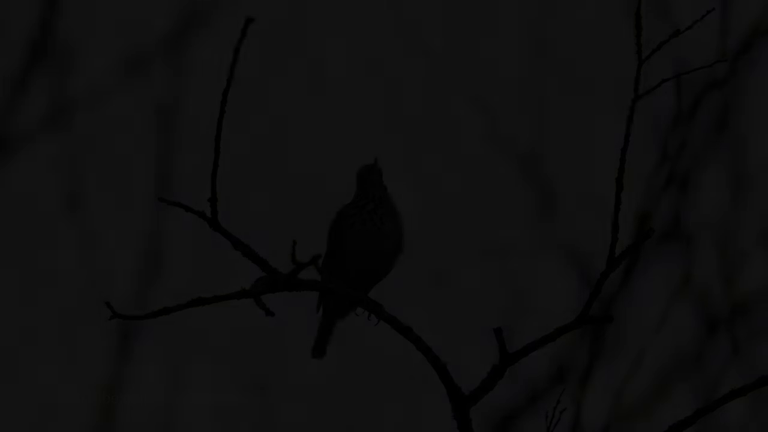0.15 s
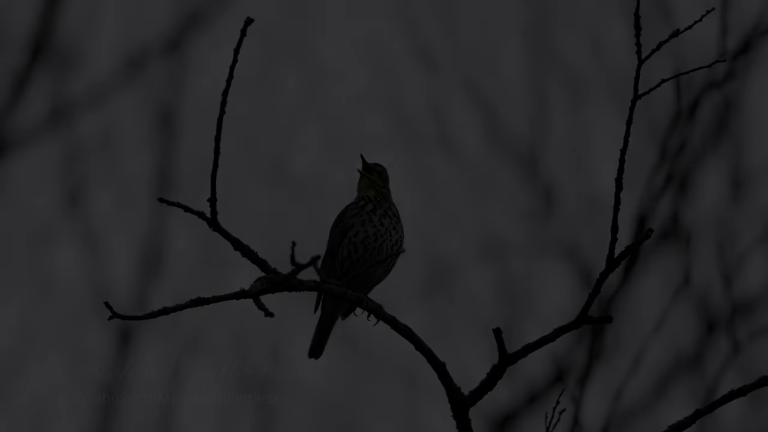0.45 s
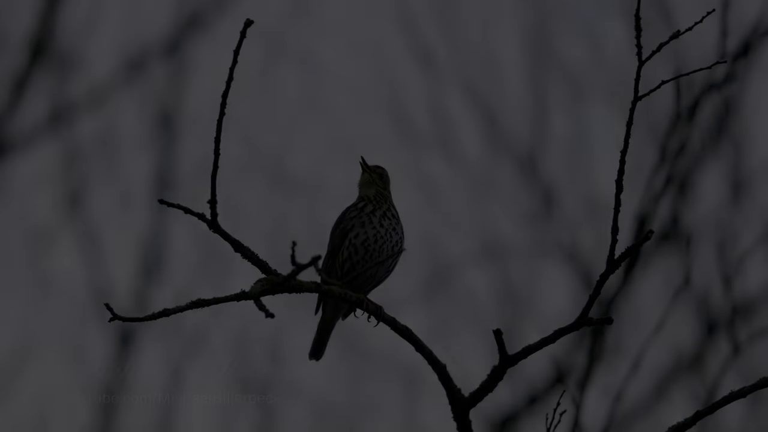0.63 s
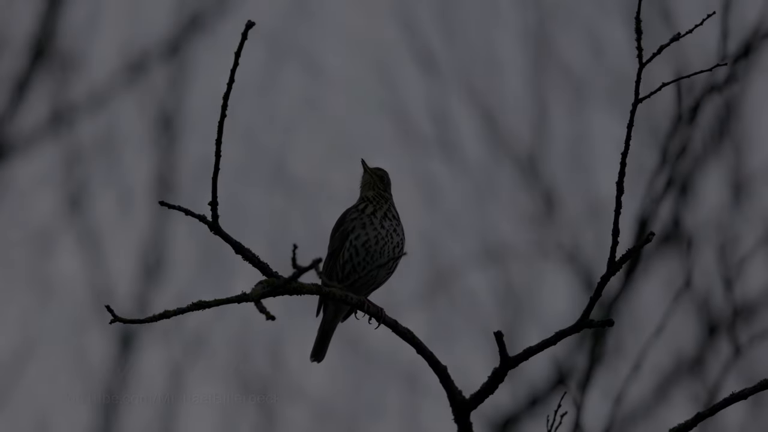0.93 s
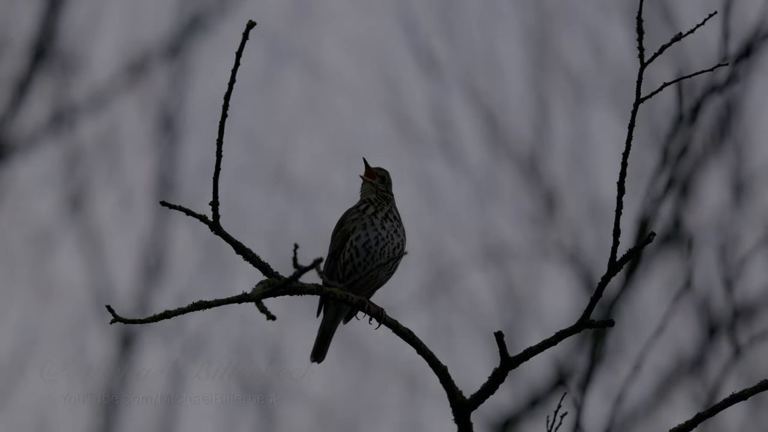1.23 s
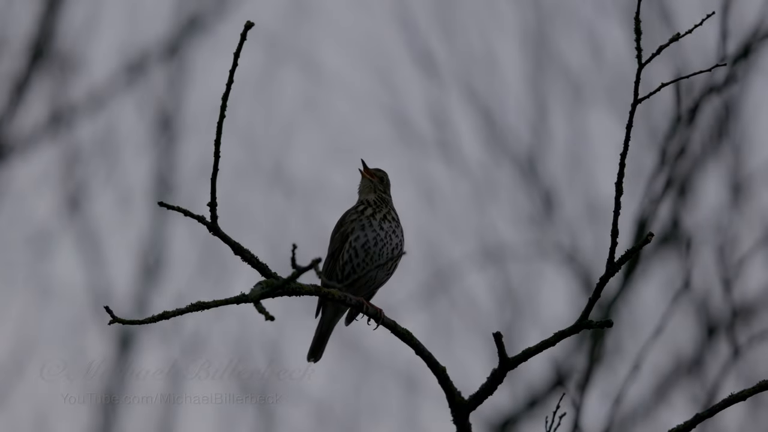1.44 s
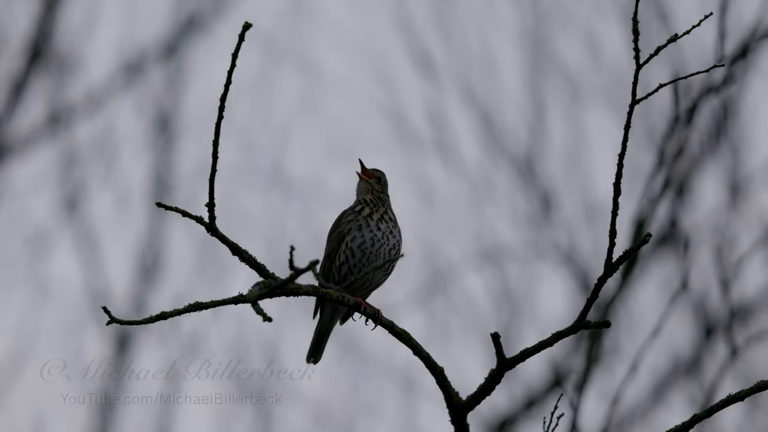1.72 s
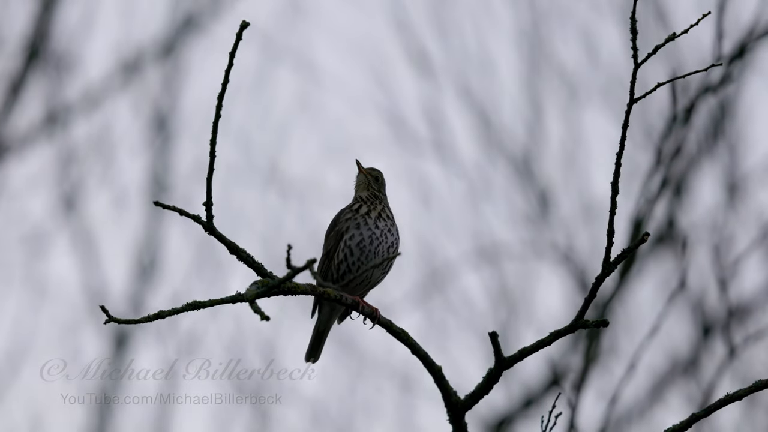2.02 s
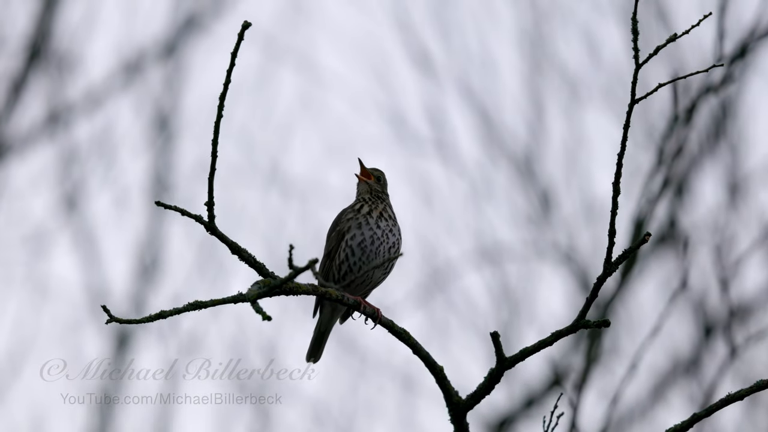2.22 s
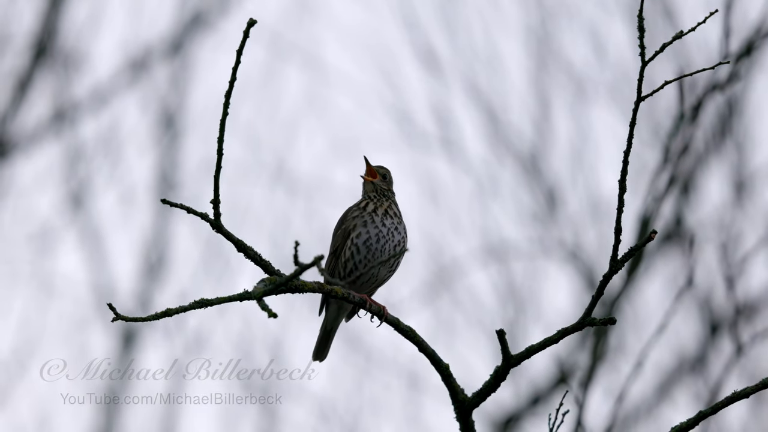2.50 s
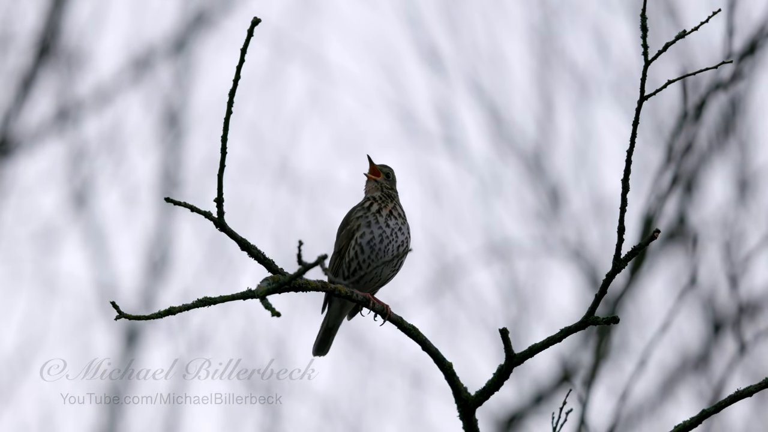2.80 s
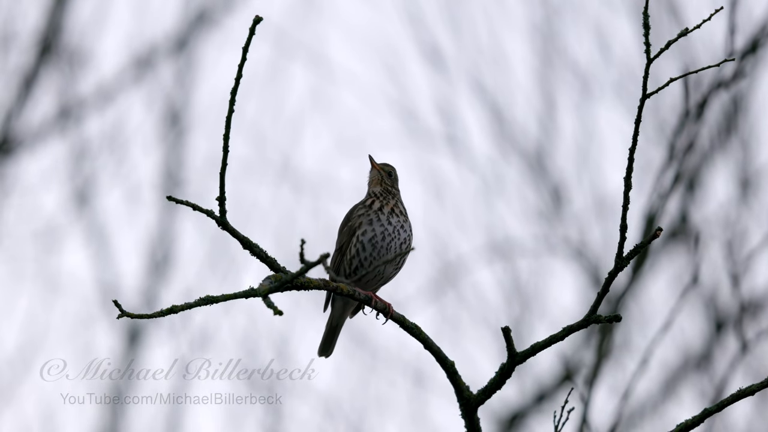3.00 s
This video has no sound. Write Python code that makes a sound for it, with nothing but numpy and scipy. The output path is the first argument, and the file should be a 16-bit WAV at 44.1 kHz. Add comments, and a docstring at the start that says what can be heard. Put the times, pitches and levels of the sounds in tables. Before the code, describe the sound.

A songbird sings short buzzy notes, high twitters and a rising whistle over a distant roar.

```python
"""A song thrush sings from a bare branch. First eight buzzy notes from the two coupled voices
of its syrinx, with one bill tick before the last; then two high twitters, four quick arched
chips and a rising whistle. Throughout, the trees return a thin echo, faint far birds call
and a roar like distant traffic swells, easing near the end."""
import sys
import numpy as np
from scipy import signal
from scipy.fft import rfft, irfft
from scipy.io import wavfile
from scipy.ndimage import uniform_filter1d

SR = 44100
rng = np.random.default_rng(int(sys.argv[2]) if len(sys.argv) > 2 else 0)


def wav_out(sig):
    """Save sig, one row per channel (or a flat mono array), as 16-bit PCM at SR to the path in sys.argv[1]."""
    wavfile.write(sys.argv[1], SR, np.round(np.clip(np.atleast_2d(sig).T, -1, 1) * 32767).astype(np.int16))


N = 138915


def thrush():
    """The near bird's whole phrase, dry."""
    # start_s, length_s, top_hz, low_db, high_db, flutter_hz, peak_frac, onset_db, overtone_db,
    # pulse_depth, rasp_db, swell_power, warble_hz
    notes = [(.321, .058, 2712, -29, -58, 100, 0.8, -19, -9, 0.67, -38, 2.1, 800),
             (0.496, 0.072, 3010, -21, -26, 117.6, 0.84, -14, -22.5, 0.43, -22.5, 3.2, 710),
             (0.622, 0.072, 2900, -17.5, -23, 169, 0.77, -23, -25, 0.16, -25.5, 2.2, 1248),
             (1.113, .061, 2856, -9.5, -26, 103, 0.6, -17, -19.5, 0.5, -34, 0.42, 657),
             (1.32, 0.063, 2836, -9, -13, 144.3, 0.67, -23, -23, 0.03, -21, 1.07, 1370),
             (1.451, 0.079, 2858, -10.5, -12, 185, 0.66, -18, -21.5, 0.07, -22.5, 0.88, 1395),
             (1.687, 0.075, 2738, -8, -13.5, 189.7, 0.71, -19, -25, 0.4, -34, 1.03, 1303),
             (1.821, 0.074, 2775, -8.5, -10, 173, 0.69, -24, -18.5, 0.4, -26.5, 1.8, 1353)]
    # top_s, rise_s, fall_s, top_hz, level_db, arch_power
    chips = [(2.544, 0.007, 0.013, 6000, -3.5, 1.17), (2.597, 0.026, 0.011, 6590, -6.5, 1.7),
             (2.651, .028, 0.014, 7500, -8, 2.15), (2.706, 0.031, 0.016, 8180, -9.5, 1.88)]
    song = twitters()
    for start_s, *note in notes:
        add(song, start_s, buzzy_note(*note))
    for row in chips:
        add(song, *chip(*row))
    add(song, *whistle())
    add(song, *whistle_second_voice())
    add(song, 1.783, bill_tick())
    return song


def buzzy_note(length_s, top_hz, low_db, high_db, flutter_hz, peak_frac, onset_db, overtone_db,
               pulse_depth, rasp_db, swell_power, warble_hz):
    """A fluttering high voice gives way to an arching low one; coupling adds sum tones and rasp."""
    t = np.arange(0, length_s, 1 / SR)
    u, n = t / length_s, len(t)
    flutter = np.cos(phase_of(flutter_hz * (1 + 0.057 * drift(n, 60))))
    shut = (1 - flutter) / 2
    # Phases: the low voice arches; the high one warbles upward, sinks and steadies.
    top_frac = 0.63
    rise = 0.17 * abs(1 - u / top_frac) ** 1.334
    fall = 0.18 * ((u - top_frac) / (1 - top_frac)) ** 2
    arch = 1 - np.where(u < top_frac, rise, fall)
    low = phase_of(top_hz * arch * (1 + 0.022 * flutter + 0.015 * drift(n, 600)))
    high_hz = 3877 - 95 * u + warble_hz * (1 - 0.42 * u) * shut
    high = phase_of(high_hz * (1 + 0.025 * drift(n, 830)))
    # Gains: each voice swells and fades, pulsed by the flutter.
    swell_db = onset_db * abs(1 - u / peak_frac) ** swell_power
    fade_db = -13 * ((u - peak_frac) / (1 - peak_frac)) ** 2
    low_gain = amp(low_db + np.where(u < peak_frac, swell_db, fade_db))
    low_gain *= 1 - np.clip(pulse_depth * (1.3 - u), 0, 1) * shut
    high_gain = amp(high_db + np.interp(u, [0, 0.17, 0.34, 0.68, 1], [-14.5, -2, 0, -6, -20]))
    high_gain *= 1 - 0.8 * (1 - 0.13 * u) * shut
    pressure = amp(-35 * (u - 0.45) ** 2)
    coupling = np.sqrt(low_gain * high_gain) * pressure
    overtone_gain = amp(low_db + overtone_db - 62 * (u - 0.46) ** 2) * (1 - pulse_depth * shut)

    overtones = np.sin(2 * low) + amp(-13) * np.sin(3 * low)
    overtones += amp(-27) * (np.sin(4 * low) + np.sin(5 * low))
    upper_sums = np.sin(2 * low + high) + 0.48 * np.sin(low + 2 * high) + 0.41 * np.sin(2 * (low + high))
    wave = low_gain * np.sin(low) + overtone_gain * overtones
    wave += high_gain * (np.sin(high) + amp(-29) * np.sin(2 * high))
    wave += coupling * (amp(-19) * np.sin(low + high) + amp(-34) * upper_sums)
    rasp = filtered(rng.standard_normal(n), (2400, 9500), "band")
    wave += amp(rasp_db) * (coupling + high_gain * pressure) * rasp
    return wave * edges(n, 0.00083)


def twitters():
    """Two high warbles; in the first a second voice joins, breeding sum and difference tones."""
    # per twitter: time_s, pitch_hz, level_db
    warbles = [
        [(2.264, 3270, -36), (2.268, 4500, -15), (2.273, 6570, -24), (2.283, 6470, -13.5), (2.309, 6543, -12.5),
         (2.318, 5530, -15), (2.325, 6500, -14.5), (2.331, 4580, -10.5), (2.337, 5300, -24)],
        [(2.386, 3420, -34), (2.390, 4200, -14), (2.395, 6550, -17.5), (2.404, 6960, -10.5), (2.409, 6560, -11),
         (2.414, 5950, -15), (2.421, 6800, -9), (2.428, 5950, -12), (2.436, 6920, -7.5), (2.443, 5240, -10),
         (2.450, 6630, -6.5), (2.457, 4500, -11.5), (2.464, 4800, -18), (2.469, 4460, -9.5)],
    ]
    # time_s, pitch_hz, level_db
    second_voice = [(2.270, 6560, -17), (2.276, 7800, -26), (2.290, 8020, -23), (2.310, 7950, -25.5),
                    (2.318, 7350, -34), (2.325, 8400, -18.5), (2.329, 6440, -21.5)]
    song = np.zeros(N)
    for points in warbles:
        start_s, hz, db = glide(points, smooth_s=0.0026)
        add(song, start_s, tone(hz, db, second_db=-16.5, third_db=-40, jitter=0.006))
    start_s, hz, db = glide(second_voice)
    t = start_s + np.arange(len(hz)) / SR
    main_s, main_hz, main_db = np.transpose(warbles[0])
    main, upper = phase_of(np.interp(t, main_s, main_hz)), phase_of(hz)
    differences = np.sin(2 * main - upper) + np.sin(2 * upper - main) + 0.66 * np.sin(3 * main - upper)
    coupled = amp(-2) * np.sin(main + upper) + amp(-13) * differences
    wave = np.sin(upper) + amp(np.interp(t, main_s, main_db)) * coupled
    add(song, start_s, amp(db) * wave * edges(len(t), 0.0018))
    return song


def chip(top_s, rise_s, fall_s, top_hz, level_db, arch_power):
    """After a soft low turn the pitch leaps and drops; the beak favours the band near 7 kHz."""
    # pitch_hz, gain_db
    beak_response = [(2900, -19), (4000, -15), (5000, -5), (6000, -2), (6900, 3), (7500, -4.5),
                     (8200, -4.5)]
    foot_hz, turn_s, turn_db = 2865, 0.011, -30
    t = np.arange(-rise_s, fall_s, 1 / SR)
    arch_hz = top_hz - (top_hz - foot_hz) * abs(t / np.where(t < 0, rise_s, fall_s)) ** arch_power
    dip_hz = 445 * rng.uniform(0.49, 1.27)
    turn_hz = foot_hz - dip_hz * np.sin(np.linspace(0, np.pi, round(turn_s * SR)))
    hz = np.r_[turn_hz, arch_hz]
    db = np.r_[np.full(len(turn_hz), turn_db), level_db + at_hz(beak_response, arch_hz)]
    reedy = np.interp(hz, [foot_hz, 5200], [1, 0])  # more overtones at low pitch
    wave = tone(hz, db, second_db=-21 + 19 * reedy, third_db=-30 + 25.4 * reedy, jitter=0.0071)
    hiss = filtered(rng.standard_normal(len(db)), 4000, "high")
    return top_s - rise_s - turn_s, wave + amp(db - 40) * hiss


def whistle():
    """A loud, nearly pure note slides up; its overtones fade with height."""
    # time_s, pitch_hz, level_db
    slide = [(2.791, 3250, -30), (2.800, 3017, -9.5), (2.811, 3143, -6.5), (2.841, 2983, -7.5),
             (2.860, 3088, -6), (2.882, 3400, -9), (2.892, 3940, -5), (2.902, 4570, -11),
             (2.913, 4425, -10), (2.921, 4560, -29)]
    # frequency_hz, gain_db
    overtone_response = [(6000, 7), (7000, 1), (9000, -5), (12000, -11), (15000, -34)]
    start_s, hz, db = glide(slide, smooth_s=0.007)
    n = len(hz)
    phase = phase_of(hz * (1 + 0.0031 * drift(n, 500)))
    overtones = sum(amp(-32 + at_hz(overtone_response, k * hz)) * np.sin(k * phase) for k in (2, 3, 4))
    return start_s, (np.sin(phase) + overtones) * amp(db + 0.05 * drift(n, 150)) * edges(n, 0.003)


def whistle_second_voice():
    """A faint rough voice above the top of the whistle."""
    # time_s, pitch_hz, level_db
    slide = [(2.866, 4670, -39), (2.876, 4870, -37), (2.883, 4640, -45), (2.896, 5190, -30.5),
             (2.918, 5340, -44)]
    start_s, hz, db = glide(slide)
    return start_s, tone(hz, db, second_db=-7, third_db=-27, jitter=0.03)


def bill_tick(decay_s=0.0015):
    """The bill snaps: a tiny bright noise burst."""
    t = np.arange(0, 0.012, 1 / SR)
    burst = rng.standard_normal(len(t)) * amp(-31) * np.exp(-t / decay_s)
    return filtered(burst, (6000, 12000), "band")


def tone(hz, level_db, second_db, third_db, jitter, shimmer_db=0.1):
    """One side of the syrinx: a slightly unsteady tone with two overtones."""
    n = len(hz)
    phase = phase_of(hz * (1 + jitter * drift(n, 700)))
    wave = np.sin(phase)
    for k, db in ((2, second_db), (3, third_db)):
        alias_guard = np.clip((SR / 2 - k * hz) / (SR / 10), 0, 1)
        wave += amp(db) * np.sin(k * phase) * alias_guard
    return wave * amp(level_db + shimmer_db * drift(n, 150)) * edges(n, 0.0013)


def far_birds():
    """Faint arched whistles from deeper in the wood."""
    # start_s, length_s, first_hz, last_hz, level_db
    calls = [(.185, 0.048, 3160, 3050, -63.5), (.28, .07, 3150, 3180, -57), (.80, 0.062, 3140, 3150, -49),
             (.98, .07, 5900, 5200, -71), (1.97, 0.057, 6050, 5800, -53), (2.18, 0.049, 3050, 3050, -38.5),
             (2.23, 0.07, 3000, 2920, -40), (2.32, 0.065, 3540, 3500, -45), (2.43, 0.037, 3990, 3350, -37),
             (2.98, 0.017, 2010, 2600, -56.5), (3.017, .013, 2560, 2150, -60),
             (3.0, 0.068, 6600, 6700, -62), (3.07, 0.052, 6550, 6650, -62)]
    song = np.zeros(N)
    for start_s, length_s, first_hz, last_hz, db in calls:
        u = np.linspace(0, 1, round(length_s * SR))
        arch = np.sin(np.pi * u)
        hz = (first_hz + (last_hz - first_hz) * u) * (1 + 0.046 * (arch - 0.5))
        call = tone(hz, db, second_db=-55, third_db=-47, jitter=0.008)
        add(song, start_s, np.sqrt(abs(arch)) * call)
    return song


def tree_echo(song, echoes_per_s=900, gap_s=0.005, early_db=3.5, early_t60_s=0.33):
    """Trunks and twigs scatter the song: a quick cluster, then a long thin tail."""
    # frequency_hz, t60_s
    wood_decay = [(2000, 1.6), (3000, 0.82), (4500, 0.74), (7000, 0.56), (14000, 0.14)]
    # frequency_hz, gain_db
    wood_colour = [(2000, 1.5), (3000, 0.5), (4500, 2), (7000, 1), (10000, 2.5), (15000, -1)]
    taps = rng.standard_normal(SR) * (rng.random(SR) < echoes_per_s / SR) * (np.arange(SR) > gap_s * SR)
    hz, t, bins = signal.stft(taps, SR, nperseg=256)
    decay = amp(-60 * t / at_hz(wood_decay, hz)[:, None]) + amp(early_db - 60 * t / early_t60_s)
    tail = signal.istft(bins * decay, SR, nperseg=256)[1][:SR]
    colour = amp(at_hz(wood_colour, np.fft.rfftfreq(SR, 1 / SR)))
    tail = irfft(rfft(tail / np.linalg.norm(tail)) * colour)
    return signal.fftconvolve(song, tail)[:N]


def distant_roar():
    """A swelling low roar like far traffic, with a faint hiss above it."""
    # frequency_hz, relative_db
    roar_spectrum = [(20, -44.5), (38, -26), (58, -8), (74, -6.5), (88, 0.5), (108, -10.5), (135, -4.5),
                     (200, 0.5), (420, -4), (650, -3), (1150, -7.5), (1500, -15), (2000, -23), (3000, -26),
                     (5000, -44.5), (9000, -50)]
    hiss_spectrum = [(1500, -55), (2900, 19.5), (4000, 5.5), (6000, -1), (8500, -4), (13000, -1),
                     (16000, -2)]
    # time_s, level_db
    roar_level = [(0.0, -95), (0.09, -68), (0.25, -51.5), (0.49, -42), (0.58, -52.5), (0.64, -40.5),
                  (0.68, -48), (1.0, -36), (1.6, -33.5), (1.71, -29.5), (1.91, -30), (2.39, -24),
                  (2.6, -26), (2.64, -29), (2.7, -26.5), (2.87, -28), (2.9, -33.5), (3.15, -30.5)]
    hiss_level = [(0, -100), (.3, -67.5), (1.0, -58), (1.7, -49), (2.4, -45.5), (2.75, -46.5),
                  (2.95, -51.5), (3.15, -52.5)]
    roar = patchy_noise(roar_spectrum, roar_level, patch_db=1.1)
    return roar + patchy_noise(hiss_spectrum, hiss_level, patch_db=1.0)


def patchy_noise(spectrum, level, patch_db):
    """Coloured noise with drifting spectral patches, following a level curve."""
    hz = np.fft.rfftfreq(4096, 1 / SR)
    real, imag, patches = rng.standard_normal((N // 1024 + 5, len(hz), 3)).T
    patches = uniform_filter1d(patches, size=30, axis=0)  # across frequency
    patches = unit_rms(uniform_filter1d(patches, size=4, axis=1))  # across time
    bins = (real + 1j * imag) * amp(at_hz(spectrum, hz)[:, None] + patch_db * patches)
    noise = signal.istft(bins, nperseg=4096, noverlap=3072)[1][:N]
    return unit_rms(noise) * amp(np.interp(np.arange(N) / SR, *np.transpose(level)))


def glide(points, smooth_s=0.0013):
    """Start time, rounded pitch curve and level curve of a gesture."""
    time_s, hz, db = np.transpose(points)
    t = np.arange(time_s[0], time_s[-1], 1 / SR)
    rounded_hz = uniform_filter1d(np.interp(t, time_s, hz), round(smooth_s * SR), mode="nearest")
    return time_s[0], rounded_hz, np.interp(t, time_s, db)


def drift(n, cutoff_hz):
    """Random wander, rms about 1."""
    hz = np.fft.rfftfreq(8192, 1 / SR)
    return unit_rms(irfft(rfft(rng.standard_normal(8192)) / (1 + (hz / cutoff_hz) ** 4)))[:n]


def edges(n, fade_s):
    """Soft start and stop."""
    k = np.arange(n)
    return np.sin(np.pi / 2 * np.minimum(np.minimum(k, k[::-1]) / (fade_s * SR), 1)) ** 2


def at_hz(points, hz):
    """Table lookup on a log-frequency axis."""
    table_hz, value = np.transpose(points)
    return np.interp(np.log(hz + 1), np.log(table_hz + 1), value)


def filtered(x, cutoff_hz, kind):
    return signal.lfilter(*signal.butter(2, cutoff_hz, kind, fs=SR), x)


def phase_of(hz):
    return 2 * np.pi * np.cumsum(hz) / SR


def amp(db):
    return 10 ** (np.asarray(db) / 20)


def unit_rms(x):
    return x / np.sqrt(np.mean(x ** 2) + 1e-20)


def add(mix, start_s, sound):
    part = mix[round(start_s * SR):][:len(sound)]
    part += sound[:len(part)]


def scene():
    """Birds, echoes and roar, the same on both channels."""
    song, far = thrush(), far_birds()
    mono = song + amp(-17) * tree_echo(song) + far + amp(-5) * tree_echo(far)
    mono += distant_roar()
    return np.array([mono, mono])


def record(dry):
    """Steep low-pass at 15.9 kHz."""
    lowpass = signal.firwin(511, 15900, window=("kaiser", 9), fs=SR)
    return signal.oaconvolve(dry, lowpass[None], "same")


dry = scene()
out = record(dry)
wav_out(out)
```